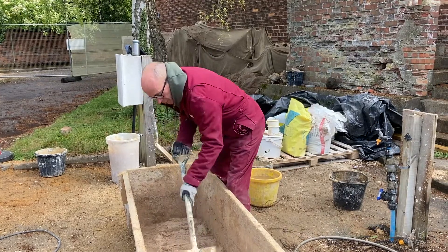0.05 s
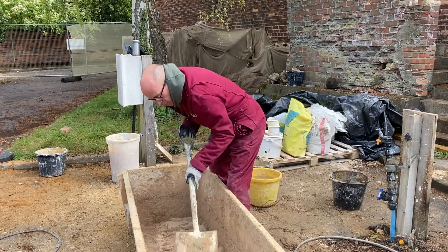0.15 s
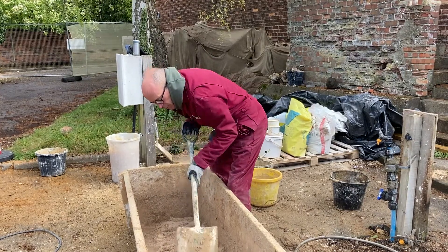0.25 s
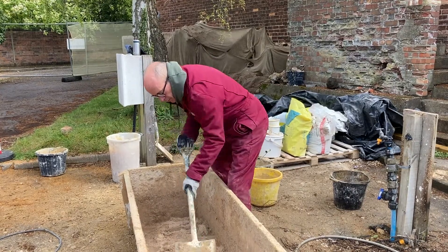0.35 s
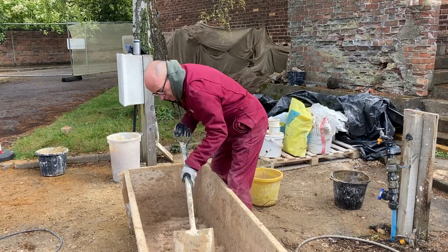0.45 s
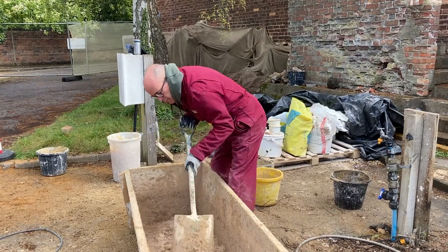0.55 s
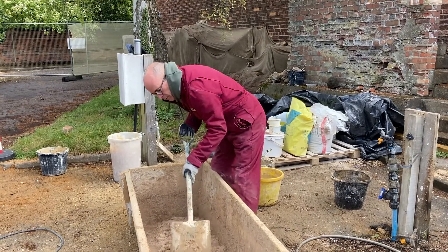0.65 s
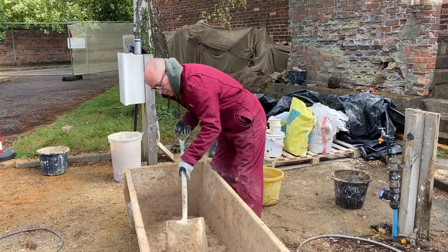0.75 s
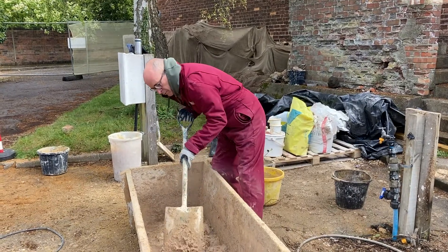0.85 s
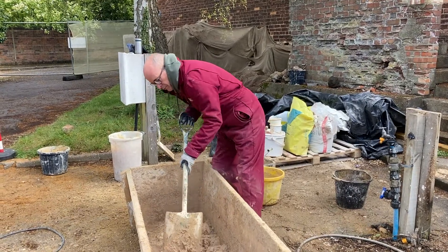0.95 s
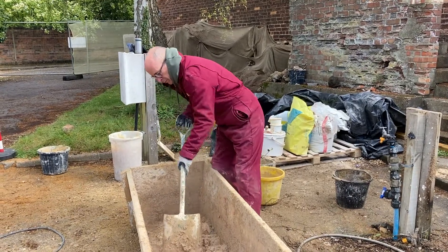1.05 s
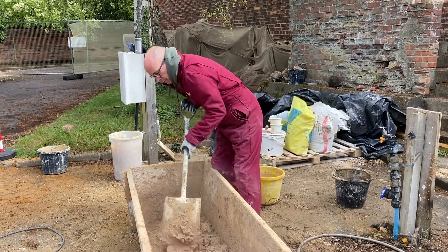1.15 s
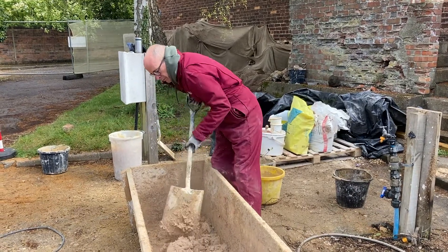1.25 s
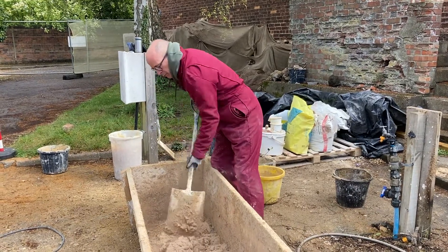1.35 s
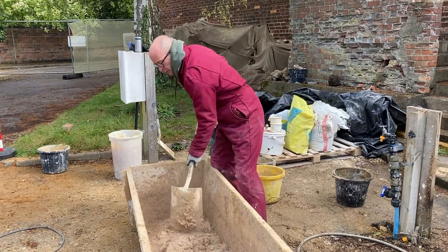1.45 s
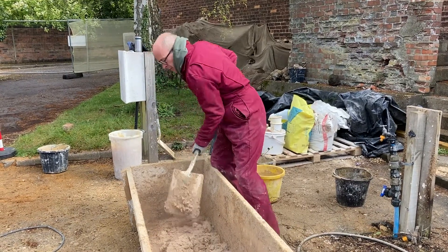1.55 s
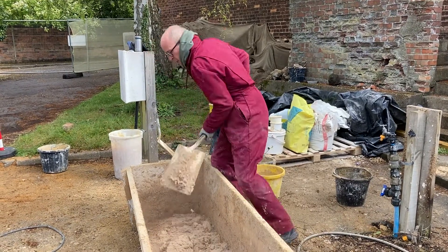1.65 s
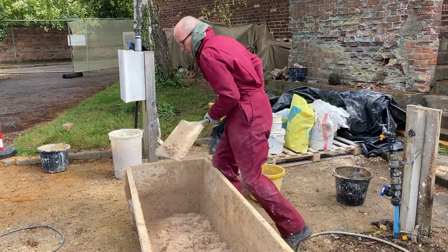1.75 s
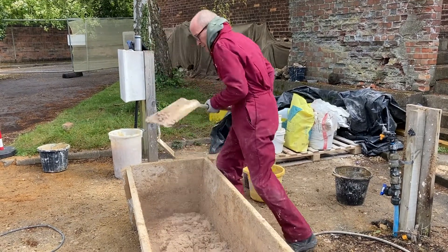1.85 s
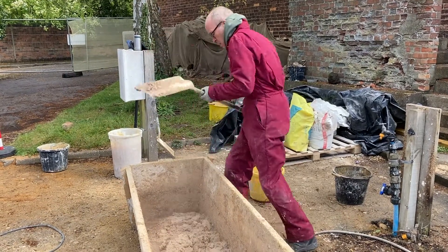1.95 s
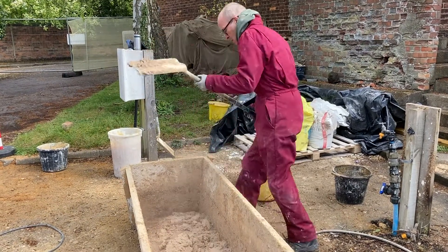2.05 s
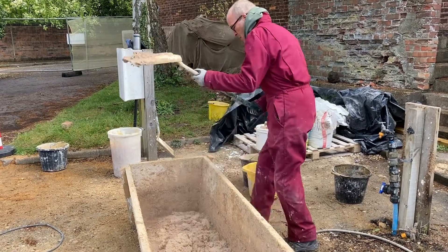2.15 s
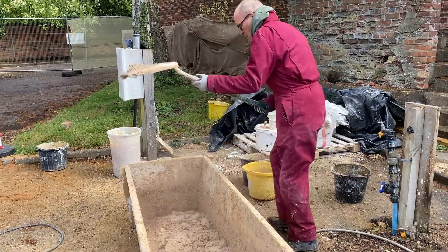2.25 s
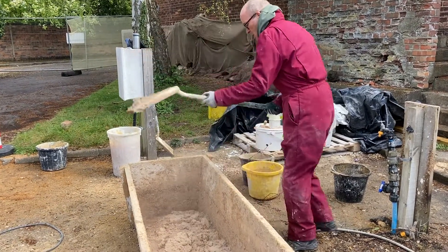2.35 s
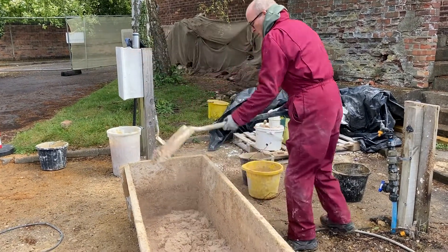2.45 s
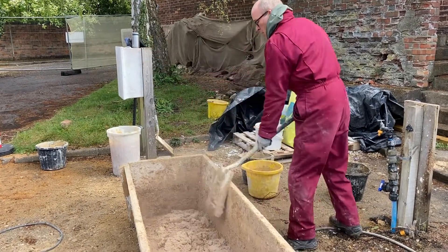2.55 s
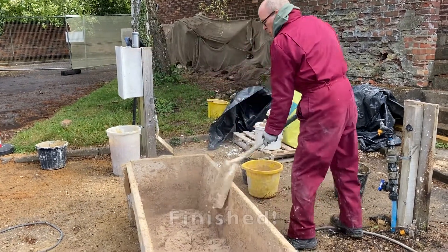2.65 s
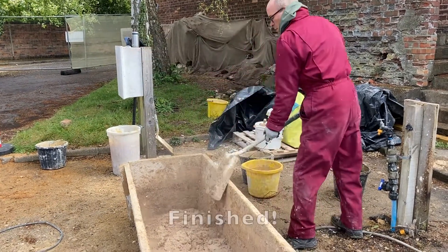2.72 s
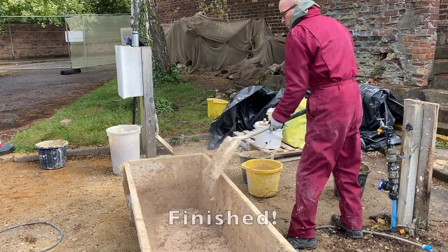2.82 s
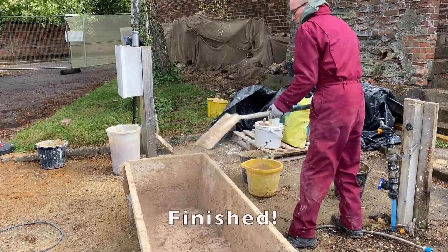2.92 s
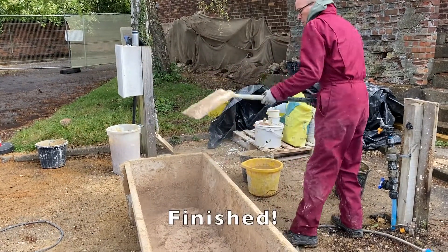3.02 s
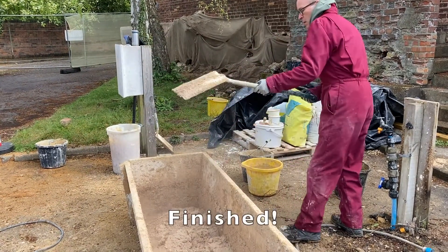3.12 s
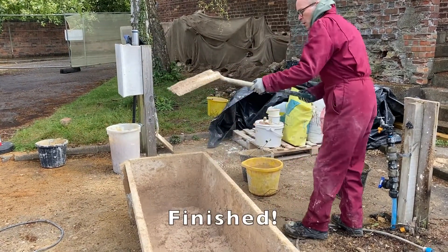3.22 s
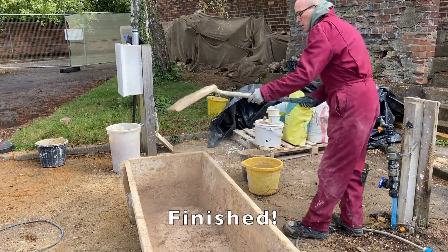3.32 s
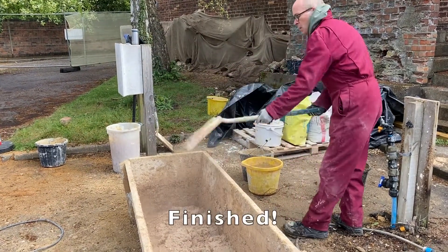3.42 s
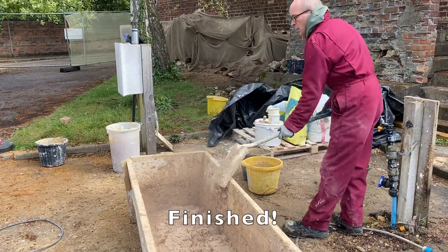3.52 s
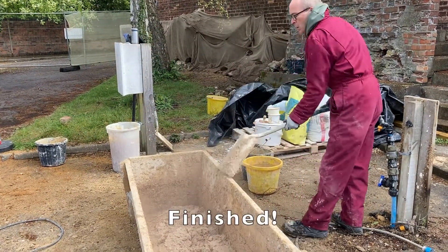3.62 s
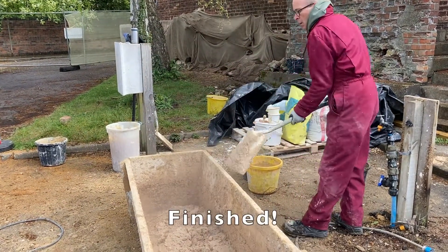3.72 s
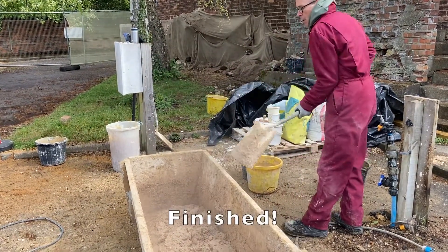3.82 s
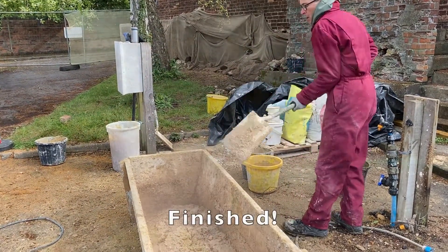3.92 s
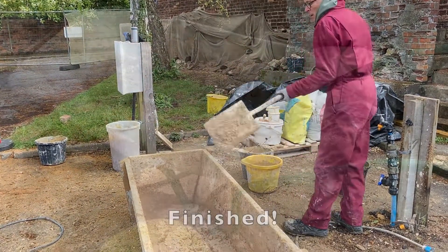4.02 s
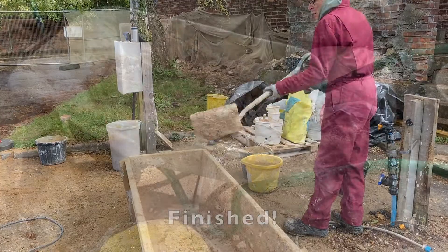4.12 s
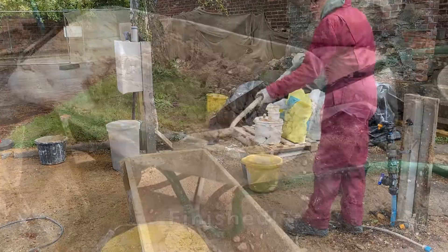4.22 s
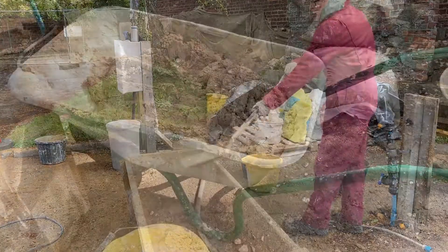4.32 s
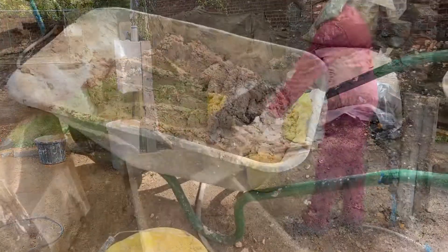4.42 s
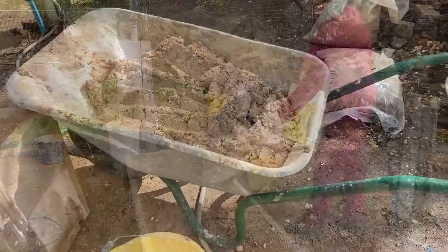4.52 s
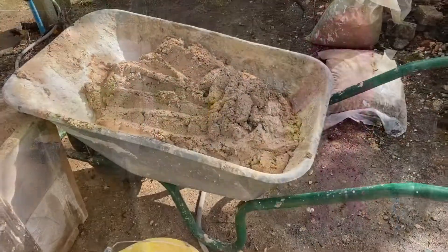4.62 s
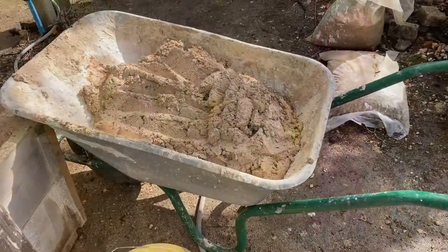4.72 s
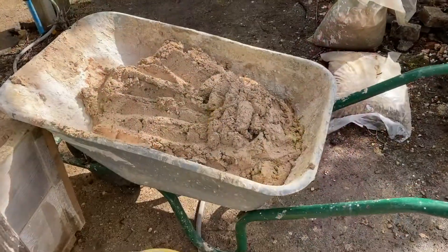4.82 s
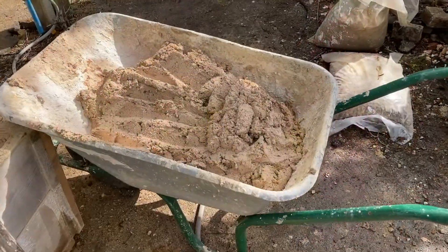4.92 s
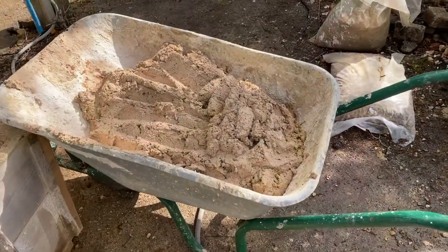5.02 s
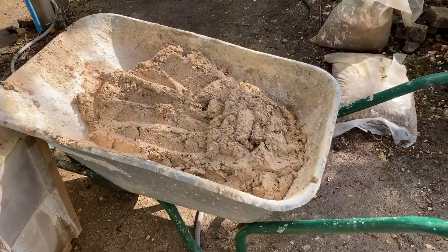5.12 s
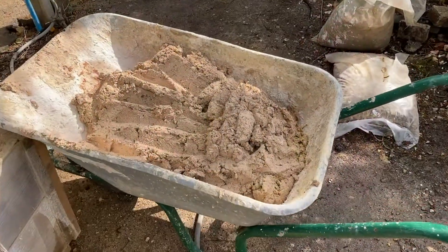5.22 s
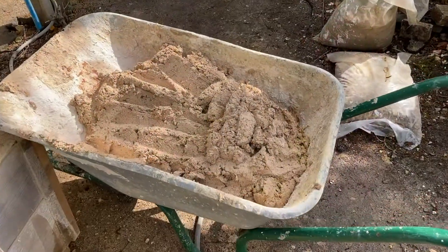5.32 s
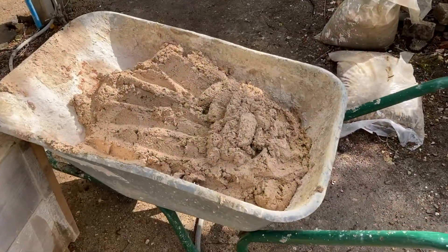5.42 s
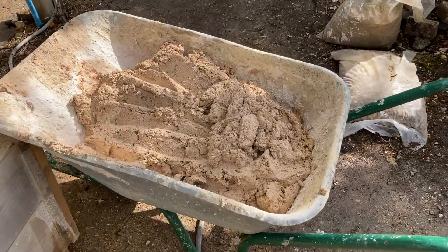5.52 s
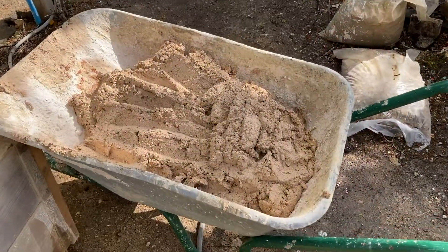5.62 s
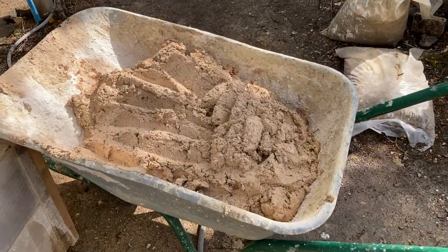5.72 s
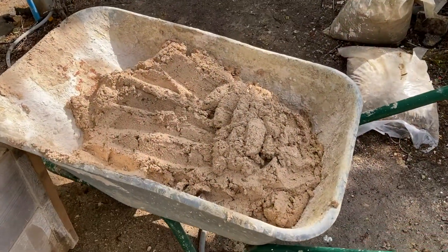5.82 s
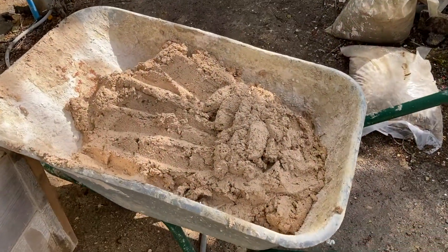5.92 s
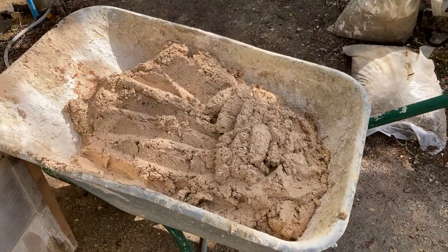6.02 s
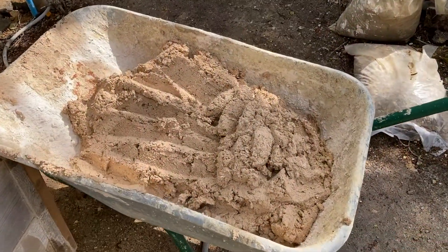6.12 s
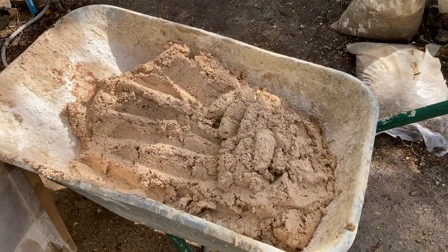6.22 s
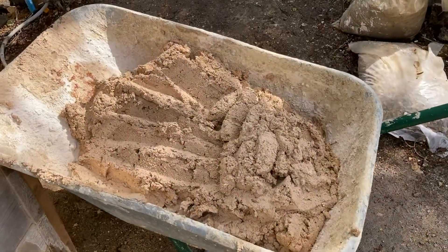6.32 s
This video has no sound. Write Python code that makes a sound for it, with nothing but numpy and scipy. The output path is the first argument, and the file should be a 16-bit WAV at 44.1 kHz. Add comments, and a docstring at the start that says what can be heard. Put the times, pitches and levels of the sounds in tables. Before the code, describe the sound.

Close stereo pickup outdoors: sandy crunches and faint metallic ringing from a shovel blade, low thuds against the trough, over a constant low engine drone and chirping birds. The blade lifts, grit slides, and mortar plops heavily into a plastic tub twice, then once more lightly. The drone dissolves into a calmer place with distant traffic hum, quick bird peeps, tiny hard ticks, one brief crackly rustle and a dull pop.

```python
"""A shovel scrapes gritty mortar in a wooden trough in a yard, with low thuds at first; grains are random clicks.
An engine of steady partials drones nearby and birds call in gliding tones; small ticks snap and ring.
Three loads are tipped into a plastic tub, whose modes swell and are damped by the mortar, with a gritty splat.
About the last load the yard cross-fades to a quieter spot of shaped noise: far vehicles hum as low tones,
other birds peep, more ticks sound, grains rustle once and a dull pop is heard."""
import sys
import numpy as np
from scipy import signal
from scipy.fft import rfft, irfft, next_fast_len
from scipy.io import wavfile

SR = 44100
rng = np.random.default_rng(int(sys.argv[2]) if len(sys.argv) > 2 else 0)


def pcm_store(signal):
    """Save signal as 16-bit PCM."""
    levels = np.round(np.clip(np.atleast_2d(signal), -1, 1) * 32767)
    wavfile.write(sys.argv[1], SR, levels.astype(np.int16).T)


N = 280917
T = np.arange(N) / SR
SIZE = next_fast_len(N + SR // 4)   # room for the tails of notes and echoes
HZ = np.arange(SIZE // 2 + 1) * SR / SIZE

# direction of the engine and of the first spot's air: (frequency [Hz], left minus right [dB])
ENGINE_PAN = [(60, 3), (200, 10.5), (600, 7.5), (3000, 1), (7000, 0)]
# direction of shovel and tub: (frequency [Hz], left minus right [dB])
WORK_PAN = [(100, 3), (700, 5), (3000, 6.5), (8000, -0.5)]
# direction of the second spot's air and rustle: (frequency [Hz], left minus right [dB])
ROAD_PAN = [(60, -1.5), (200, -2), (450, 5), (2500, 1.5), (7000, -1)]
# usual coherence of the two ports: (frequency [Hz], shared part of the power [0 to 1])
LIKENESS = [(50, 0.61), (200, 0.36), (600, 0.12), (2000, 0.19), (5000, 0.043), (8000, 1)]
# mortar landing: (time [s], relative level [dB], pitch factor, brightness [dB per octave],
# softness as a factor on swell time, side wall level [dB], splat level [dB], share that rings freely [0 to 1]);
# the row with the largest free share is the floor springing back
LUMPS = [(2.539, -1, 1.005, -3.5, 1.04, -17, -9, 0.18), (2.5475, -8, 1.04, -3, 0.97, -9.5, -25, 0.2),
         (2.631, -5.5, 1.025, -17, 1.4, -20.5, -27, 0.28), (2.659, -13.5, 0.94, -21, 1.3, -15, -30, 0.22),
         (3.109, -42, 1.37, 4.5, 0.62, 8.5, -41, 0.12), (3.474, -5.5, 1.025, -0.5, 1.33, -2.5, -13.5, 0.2),
         (3.482, -19.5, 1.23, 3, 0.82, -10, -42, 0.065), (3.547, -9.5, 1.01, -11, .35, -15, -40, .92),
         (3.64, -21.5, 0.87, -13, 1.2, -6, -40, 0.26), (4.366, -45, 0.83, 5, 2.8, 11, -55, .15),
         (4.371, -17, 0.97, -5.5, 0.87, -0.5, -30.5, .12)]


def amp(db):
    """Level law: the amplitude gain of a dB value."""
    return 10 ** (np.asarray(db) / 20)


def rms_one(x):
    """Power normalisation: scale to rms 1."""
    return x / np.sqrt(np.mean(x ** 2) + 1e-20)


def in_time(rows):
    """Linear interpolation: the columns of a curve, sample by sample."""
    s, *columns = np.transpose(rows)
    return [np.interp(T, s, column) for column in columns]


def at_hz(points, hz=HZ):
    """Logarithmic frequency scale: a spectrum interpolated between its points."""
    known_hz, values = np.array(points).T
    return np.interp(np.log(hz + 1), np.log(known_hz + 1), values)


def drift(rate):
    """Low-passed noise: a random fluctuation of spread 1, with its two equal poles at rate [Hz]."""
    step = 40   # samples between the computed points
    pole = np.exp(-2 * np.pi * step * rate / SR)
    noise = rng.standard_normal(N // step + 2002)
    slow = signal.lfilter([1], [1, -2 * pole, pole * pole], noise)[2000:]   # settled part
    return np.interp(np.arange(N) / step, np.arange(len(slow)), rms_one(slow))


def ports(common, left=0, right=0, pan_db=0):
    """Interaural phase: spectra to two channels, the common part reaching the left port later."""
    # phase between the ports: (frequency [Hz], lead of the left [half turns])
    port_turns = [(0, 0), (700, -.25), (3500, -1.75), (6900, -4), (9050, -5), (11400, -6), (13700, -7),
                  (16000, -8), (22050, -10)]
    turn = np.exp(1j * np.pi * np.interp(HZ, *np.transpose(port_turns)))
    left_port = (common * turn + left) * amp(pan_db / 2)
    right_port = (common + right) * amp(-pan_db / 2)
    return irfft([left_port, right_port], SIZE)[:, :N]


def coloured(sources, spectrum, pan, likeness=LIKENESS):
    """Partial coherence: mix common, left-only and right-only sources, coloured, to two ports of rms 1."""
    alike = np.clip(at_hz(likeness), 0, .97)
    common, left, right = rfft(sources, SIZE) * amp(at_hz(spectrum))
    apart = np.sqrt(1 - alike)
    return rms_one(ports(np.sqrt(alike) * common, apart * left, apart * right, at_hz(pan)))


def air(spectrum, pan, likeness, patchy_db):
    """Broadband turbulence: shaped noise whose level wavers by patchy_db."""
    return coloured(rng.standard_normal((3, N)), spectrum, pan, likeness) * amp(patchy_db * drift(16.0))


def grains(per_s, spread_db):
    """Poisson-like impacts: three streams of random clicks of uneven size and sign."""
    sizes = amp(spread_db * np.minimum(rng.exponential(1, (3, N)), 4))
    signs = rng.choice([-1, 1], (3, N))
    return sizes * signs * (rng.random((3, N)) < per_s / SR)


def echoes(x, level_db, t60):
    """Diffuse reflection: spectra of the scattered return from walls and trees, one for each port."""
    tail = np.arange(SR // 5) / SR
    decay = amp(level_db - 60 * tail / t60)
    return [rfft(decay * rng.standard_normal(len(tail)), SIZE) * rfft(x) for side in range(2)]


def yard_air():
    """Ambient noise: the almost steady air of the first spot."""
    # colour: (frequency [Hz], relative spectral level [dB])
    yard_colour = [(25, -26), (50, 10), (110, -10), (200, 0), (400, -24), (900, -23.5), (2000, -34),
                   (4500, -41), (8000, -55.5), (16000, -97)]
    return amp(-32) * air(yard_colour, ENGINE_PAN, LIKENESS, patchy_db=.4)


def road_air():
    """Ambient noise: the air of the second spot, with its far traffic."""
    # colour: (frequency [Hz], relative spectral level [dB])
    road_colour = [(20, -80), (44, -0.5), (96, -6.5), (200, -17), (400, -32.5), (850, -25), (1900, -33),
                   (3500, -44.5), (6000, -58.5), (16000, -82)]
    # coherence of the ports: (frequency [Hz], shared part of the power [0 to 1])
    road_likeness = [(60, 0.99), (130, 0.92), (400, 0.024), (5000, 0.52), (8000, .93)]
    return amp(-42.5) * air(road_colour, ROAD_PAN, road_likeness, patchy_db=1.0)


def hum():
    """Narrow-band noise: a faint breathy hum at the first spot."""
    # colour: (frequency [Hz], relative spectral level [dB])
    hum_colour = [(590, -28.5), (642, 3), (695, -39)]
    return amp(-59) * air(hum_colour, ENGINE_PAN, LIKENESS, patchy_db=3.5)


def engine():
    """Harmonic series: a steady firing cycle as partials spread out by the exhaust pipe, breathing slightly."""
    # partials: (multiple of the cycle rate, relative level [dB])
    partials = [(2, -31), (3, 4), (4, -6), (5, -11.5), (7, -1), (8, -10.5), (9, -10.5), (10, -18.5),
                (12, -13), (13, -24.5), (14, -23.5), (18, -28.5)]
    cycle_hz, level = 25.27, amp(-31.5)   # mean cycle rate
    turn = 2 * np.pi * np.cumsum(cycle_hz * (1 + .001 * drift(1.5))) / SR
    breathing_db = [.5 * drift(2.0) for _ in range(4)]
    half, left_lead = np.array([[.5], [-.5]]), np.array([[.35], [-.35]])
    out = 0
    for k, (multiple, level_db) in enumerate(partials):
        pan_db = at_hz(ENGINE_PAN, multiple * cycle_hz) * half
        phase = multiple * (turn + 1.234) + 0.1354 * multiple ** 2 + left_lead   # square term: pipe dispersion
        out = out - amp(level_db + pan_db + breathing_db[k % 4]) * np.cos(phase)
    return level * out


def vehicles():
    """Frequency modulation: soft low engine notes of far vehicles come and go."""
    # one table a vehicle: (time [s], frequency [Hz], level before a common 6 dB lift [dB])
    vehicle_notes = [
        [(4.5, 114, -50), (4.864, 113.6, -45.5), (5.1, 107, -62)],
        [(5.45, 58.64, -46), (6.202, 57.96, -41), (6.37, 61.6, -42)],
    ]
    out = 0
    for rows in vehicle_notes:
        hz, level_db = in_time(rows)
        inside = np.minimum(T - rows[0][0] + 0.24, rows[-1][0] - T + 0.25)   # s from the nearer end
        heard = np.clip(inside / 0.054, 0, 1)
        out = out + heard * amp(level_db + 6.0) * np.sin(2 * np.pi * np.cumsum(hz) / SR)
    return out


def birds():
    """Gliding tones: notes with an uneven trill, blurred by echoes off walls and trees."""
    # mellow whistles, most sinking: (time [s], length [s], start frequency [Hz], sink [Hz], level [dB])
    whistles = [(0, 0.185, 4965, 1148, -46.5), (0.25, 0.17, 2950, 60, -52), (0.44, 0.27, 2860, 259, -55),
                (1.168, 0.15, 4150, 418, -56.5), (1.304, 0.074, 3244, 60, -51),
                (1.368, 0.094, 3520, -20, -58), (1.378, 0.023, 3790, -150, -46.5),
                (1.41, 0.075, 4050, 280, -52), (1.502, 0.095, 3930, 73, -60), (2.09, 0.058, 3760, 1, -58),
                (2.43, 0.066, 3820, 72, -54), (2.478, 0.057, 3490, -60, -60),
                (2.739, 0.045, 3290, 145, -53), (2.81, 0.068, 3190, 41, -59), (2.795, 0.069, 3850, 25, -60),
                (2.89, 0.15, 3290, 66.5, -67), (1.88, 0.093, 8100, 445, -56),
                (2.156, 0.094, 7910, 299, -56.5), (5.64, 0.094, 4580, 33, -61),
                (5.87, 0.094, 4430, 60, -63), (6.31, 0.054, 3350, 7, -60)]
    # short peeps: (time [s], length [s], start frequency [Hz], level [dB])
    peeps = [(1.795, 0.057, 7800, -58), (4.518, 0.025, 7270, -59), (4.578, 0.026, 6180, -50.5),
             (4.656, 0.06, 6270, -54), (4.665, .04, 6650, -65), (4.743, 0.012, 5620, -48.5),
             (4.843, 0.062, 6260, -56), (5.003, 0.11, 5870, -62), (5.031, 0.035, 7060, -54.5),
             (5.084, 0.026, 7500, -57), (5.104, 0.036, 6820, -63), (5.16, 0.03, 7470, -63),
             (5.181, .016, 6470, -54), (5.2, 0.014, 7080, -58.5), (5.192, 0.021, 6050, -52)]
    # quick rising flicks that open a phrase: (time [s], level [dB])
    flicks = [(4.565, -51), (4.992, -52)]
    notes = list(whistles)
    notes += [(s, length, hz, 40, db) for s, length, hz, db in peeps]
    notes += [(s, .011, 5000, -1400, db) for s, db in flicks]
    for pair in range(5):   # a run of pairs of falling chirps, each pair 1 dB fainter
        for second in range(2):
            notes.append((1.968 + pair * .101 + second * .021, .027, 6660, 950, -60.5 - pair))
    spread_hz = 500
    for u, v, w in rng.random((40, 3)):   # faint far twitter whose pitch sinks along the song
        start_hz = 8000 - 895 * u + spread_hz * (2 * v - 1)
        notes.append((4.4 + .6 * u, .012, start_hz, spread_hz * (2 * w - 1), -66))
    song, trill = np.zeros(SIZE), drift(51.0)
    for s, length, start_hz, sink_hz, level_db in notes:
        at, t = round(s * SR), np.arange(round(length * SR)) / SR
        pitch = (start_hz - sink_hz * t / length) + 38 * np.resize(trill[at:], len(t))
        swell = np.sin(np.pi * t / length) ** 0.18
        song[at:at + len(t)] += amp(level_db) * swell * np.sin(2 * np.pi * np.cumsum(pitch) / SR)
    song = song * amp(2 * np.resize(drift(33.0), SIZE))   # level flutter
    return ports(rfft(song), *echoes(song, level_db=-34, t60=.32), pan_db=-0.5)


def pop():
    """Pressure pulse: a single soft push of air, one dull low pop at the second spot."""
    time_s, width_s = 5.9552, 0.00041
    return -amp(-34.5) * np.exp(-((T - time_s) / width_s) ** 2)


def rustle():
    """Dense random impacts: one crackly rustle at the second spot that rises, holds and falls."""
    # colour: (frequency [Hz], relative spectral level [dB])
    rustle_colour = [(900, -1), (2000, 4), (3000, 3), (4500, -5.5), (8000, -8), (13500, -7), (16500, -40)]
    start_s, rise_s, hold_s, fall_s = 5.6, 0.11, 0.11, 0.19
    end_s = start_s + rise_s + hold_s + fall_s
    shape = np.clip(np.minimum((T - start_s) / rise_s, (end_s - T) / fall_s), 0, 1)
    level = amp(-51.5 + 1.6 * drift(45.0))
    return shape * level * coloured(grains(9000, spread_db=6.0), rustle_colour, ROAD_PAN)


def ticks():
    """Impulse response: a bright snap of noise with a lower ring of a few cycles."""
    # small hard ticks: (time [s], level before colouring [dB], share that rings rather than snaps [0 to 1])
    tick_list = [(0.9074, -43, .4), (0.932, -44, .3), (0.941, -29, .1), (1.357, -31, .05), (2.822, -42, .1),
                 (2.9787, -41, 0.11), (2.994, -41.5, .1), (4.753, -33, 0.7), (4.7706, -26.5, 0.79),
                 (4.8032, -40, 0.98), (5.195, -47, 0.99), (5.2685, -36, 0.53), (5.454, -42, 0.54),
                 (5.606, -47, 0.1), (5.69, -45, 0.16), (5.777, -40, 0.84), (5.872, -35, 0.55)]
    ring_hz, ring_t60_s, snap_t60_s = 3080, .0031, .012
    out, t = np.zeros((2, SIZE)), np.arange(SR // 25) / SR
    noise = rng.standard_normal((len(tick_list), len(t)))
    for (s, peak_db, rings), snap in zip(tick_list, noise):
        at, rings = round(s * SR), np.clip(rings, 0, 1)
        decay = amp(peak_db - 60 * t / [[ring_t60_s], [snap_t60_s]])
        out[:, at:at + len(t)] += decay * [rings * np.sin(2 * np.pi * ring_hz * t), (1 - rings) * snap]
    ring, snap = rfft(out)
    ring = ring * amp(at_hz([(600, -36), (2000, 7.5), (16000, 7)]))
    snap = snap * amp(at_hz([(2500, -18), (6500, -0.5), (16000, -3)]))
    return ports(ring + snap, pan_db=1.5)


def bumps():
    """Damped low-frequency impact: noise swells and dies as the blade bumps the trough."""
    # low thuds: (time [s], level before rise and fall [dB])
    bump_list = [(0.021, -23.5), (0.508, -23.5), (0.57, -34.5)]
    rise_s, fall_s = 0.0064, 0.057
    level = 0
    for s, db in bump_list:
        level = level + amp(db) * np.clip((T - s) / rise_s, 0, 1) * np.exp(-np.maximum(T - s, 0) / fall_s)
    thud_colour = [(25, -29.5), (55, 19), (100, 11), (200, 4.5), (400, -61)]   # (Hz, dB)
    return level * air(thud_colour, ENGINE_PAN, LIKENESS, patchy_db=4.5)


def blade(clicks):
    """Modal resonance: each mode of the steel blade rings on its own stream of clicks."""
    # modes: (frequency [Hz], relative level [dB])
    blade_modes = [(900, 4), (1230, 0.5), (1830, 2.5), (2800, -14), (4050, -7), (4870, -4.5)]
    t60_s = 0.038
    out, r = 0, amp(-60 / (t60_s * SR))
    for hz, level_db in blade_modes:
        w = 2 * np.pi * hz / SR
        ringing = signal.lfilter([0, np.sin(w)], [1, -2 * r * np.cos(w), r * r], clicks() + 1e-18)
        out = out + amp(level_db) * ringing
    return out


def big_stones():
    """Impulsive excitation: single stones that strike the whole blade, unevenly from mode to mode."""
    # strikes: (time [s], mean level [dB])
    strikes = [(0.662, -40.5), (0.907, -48), (1.06, -40)]
    s, db = np.transpose(strikes)
    clicks = np.zeros(SIZE)
    clicks[(s * SR).astype(int)] = amp(db + rng.normal(0, 2.15, len(s)))
    return clicks


def grit():
    """Granular friction: fine bright and coarse dull sand crunches, and the coarser stones ring the blade."""
    # bed, loud while the blade scrapes: (time [s], relative fine level [dB], relative coarse level [dB])
    grit_bed = [(0, -65.5, -49.5), (1.1, -58, -52), (1.45, -64, -51.5), (1.6, -81.5, -50.5),
                (4.3, -79, -66), (4.45, -62.5, -51), (5.35, -79.5, -56.5), (6.37, -80, -54.5)]
    # colour of fine grit: (frequency [Hz], relative spectral level [dB])
    fine_colour = [(2000, 7.5), (3500, 7), (5500, 6), (8000, 6.5), (11000, 4.5), (13500, 0), (16500, 0)]
    # colour of coarse grit: (frequency [Hz], relative spectral level [dB])
    coarse_colour = [(350, 14), (700, 6), (1300, 5.5), (2200, 4), (3500, -14), (6000, -30)]
    # crunches and rubs that stand out: (time [s], length scale [s], rise before shaping [dB])
    crunches = [(0.065, 0.058, 11.5), (0.238, 0.05, 12.5), (0.376, 0.07, 7.5), (0.613, 0.038, 12),
                (0.897, 0.068, 8.5), (1.048, 0.037, 12.5), (1.224, 0.1, 6), (1.37, 0.091, 8),
                (1.668, 0.13, 20), (2.016, 0.052, 17), (2.326, 0.14, 15.5), (2.655, 0.057, 14),
                (3.144, 0.11, 21), (3.591, 0.08, 14.5), (4.096, 0.094, 9), (4.465, 0.029, 5.5)]
    fine_db, coarse_db = in_time(grit_bed)
    for s, *_, splat_db, _ in LUMPS:   # sand spills after each lump
        fall_db = np.where(T > s, -125 * (T - s), -np.inf)
        fine_db = np.maximum(fine_db, splat_db - 31.5 + fall_db)
        coarse_db = np.maximum(coarse_db, 0.83 * (splat_db + fall_db) - 63)
    blade_lifts_s = 1.34   # till then the blade grinds the bottom
    coarse_share = np.where(T < blade_lifts_s, 0.68, 0.15)   # of a crunch's rise
    for s, length, rise_db in crunches:
        u = np.maximum(T - s, 0) / length
        shape = np.minimum(u * 3, 1) * np.exp(-u ** 2 / 2)   # sets in fast, dies slowly
        fine_db = fine_db + rise_db * shape
        coarse_db = coarse_db + coarse_share * rise_db * shape
    clumps = amp(1.5 * drift(40.0))
    grinding = np.clip((blade_lifts_s - T) / .15 + 1, 0, 1)
    fine = coloured(grains(9000, spread_db=3.5), fine_colour, WORK_PAN)
    fine = fine * amp(fine_db + 6.5 + 1.2 * drift(120.0))
    coarse = coloured(grains(1800, spread_db=3.0), coarse_colour, WORK_PAN) * amp(2.2 * drift(60.0))
    stones = coloured(blade(lambda: grains(90, spread_db=2.0)), [(1, 0)], WORK_PAN)
    struck = ports(rfft(blade(big_stones)), pan_db=at_hz(WORK_PAN))
    scraped = (coarse + grinding * amp(-2.5) * stones) * amp(coarse_db - 1.0)
    return struck + (fine + scraped) * clumps


def lumps():
    """Mass-loaded, damped modes: a soft heavy load swells each tub mode, smothers most of it and splats."""
    # tub modes, each slowed by the lump's softness and tuned by its pitch factor:
    # (frequency [Hz], relative level [dB], swell time [s], share in the side wall [0 to 1])
    tub_modes = [(140.5, 1.5, 0.0055, 1), (230, -1.5, 0.016, 0.034), (347.6, -1, 0.01325, 0.95),
                 (490, -8, 0.0092, 0.98), (689, -2, 0.0053, 0.085), (837.4, -6.5, 0.0065, 0.26),
                 (1037, -4.5, 0.0024, 0.31), (1480, -15, 0.0037, 0.72), (2110, -25, 0.005, 0.12)]
    body, splat, t = np.zeros(SIZE), np.zeros(N), np.arange(SR // 5) / SR
    for s, peak_db, pitch, bright_db, soft, wall_db, splat_db, rings in LUMPS:
        at = round(s * SR)
        for hz, level_db, swell, wall in tub_modes:
            u = t / (swell * soft)
            smothered = (u * np.exp(1 - u)) ** 8.1
            free = (1 - np.exp(-u ** 2)) * np.exp(-t / (swell * 3.2))
            shape = (1 - rings) * smothered + rings * free
            level = amp(peak_db + level_db + wall * wall_db + bright_db * np.log2(hz / 228))
            sag = 1 + 0.15 * min(1, 300 / hz) * np.exp(-u)   # low pitches sag most under the load
            body[at:at + len(t)] += level * shape * np.sin(2 * np.pi * hz * pitch * t * sag)
        splat[at:at + len(t)] += amp(splat_db) * np.minimum(t / 0.0033, 1) * np.exp(-t / 0.021)
    wet_colour = [(300, 19), (1000, 10.0), (2200, -4.5), (4000, -19.5), (8000, -12.0), (16000, -19.0)]
    wet = coloured(grains(12000, spread_db=4.5), wet_colour, WORK_PAN)
    dull = amp(at_hz([(350, 0), (1000, -10)]))   # the echoes lose treble
    scattered = dull * echoes(body, level_db=-40.5, t60=0.54)
    return ports(rfft(body), *scattered, pan_db=at_hz(WORK_PAN)) + splat * wet


def scene():
    """Superposition: the two spots cross-faded, with the work and the single sounds on top."""
    fade_start_s, fade_s = 3.856, 0.98
    turn = np.pi / 2 * np.clip((T - fade_start_s) / fade_s, 0, 1)
    first = engine() + yard_air() + hum()
    spots = np.cos(turn) ** 1.96 * first + np.sin(turn) * road_air()
    small_sounds = vehicles() + birds() + pop() + rustle() + ticks()
    return spots + small_sounds + bumps() + grit() + lumps()


def record(dry):
    """Band limiting and saturation: deep bass is reduced, the loudest peaks are rounded, the top is cut."""
    dry = signal.sosfilt(signal.butter(2, 38, "high", fs=SR, output="sos"), dry)
    rounded = dry / (1 + np.abs(dry / .97) ** 6) ** (1 / 6)
    top_cut = signal.cheby2(16, 60, 16200, fs=SR, output="sos")   # 60 dB down from 16.2 kHz up
    return signal.sosfilt(top_cut, rounded)


dry = scene()
out = record(dry)
pcm_store(out)
```